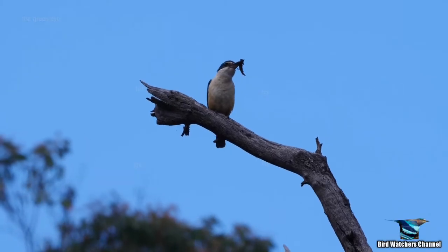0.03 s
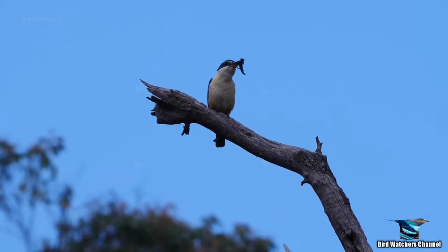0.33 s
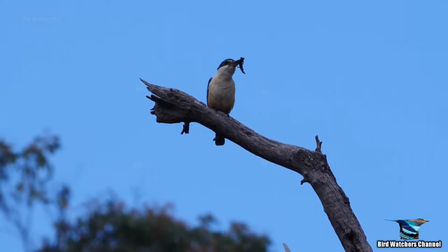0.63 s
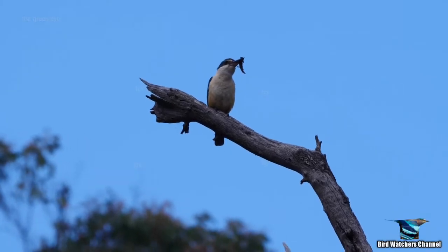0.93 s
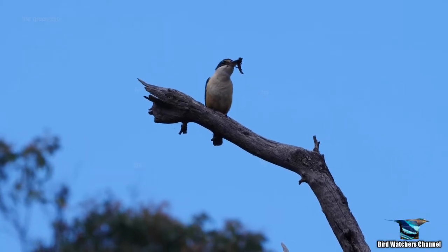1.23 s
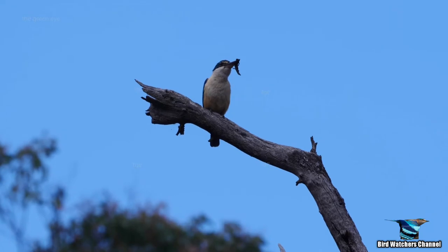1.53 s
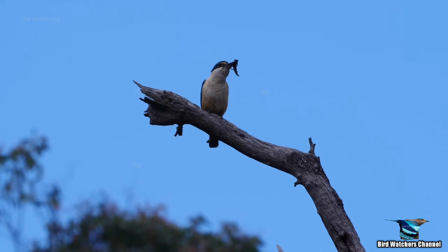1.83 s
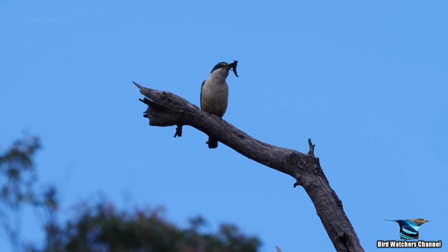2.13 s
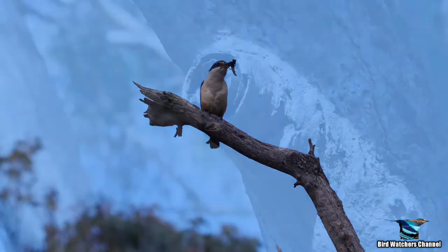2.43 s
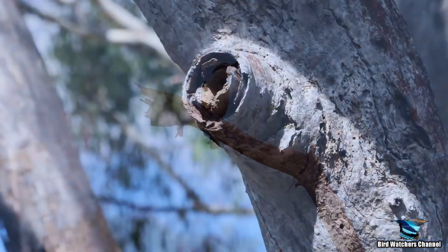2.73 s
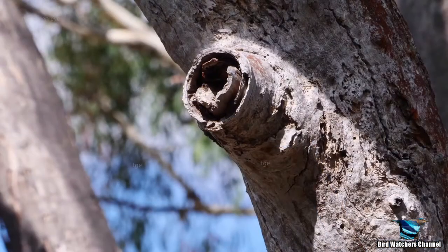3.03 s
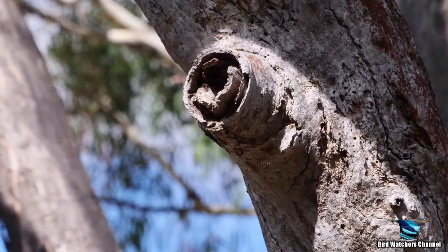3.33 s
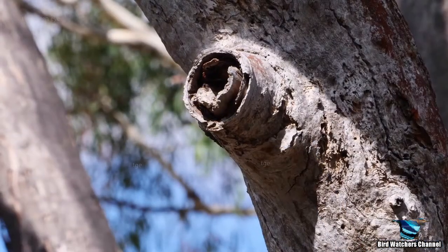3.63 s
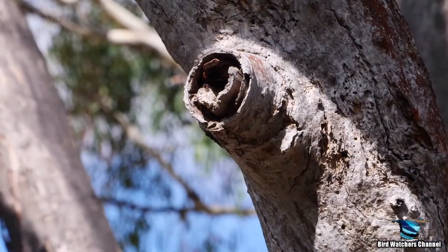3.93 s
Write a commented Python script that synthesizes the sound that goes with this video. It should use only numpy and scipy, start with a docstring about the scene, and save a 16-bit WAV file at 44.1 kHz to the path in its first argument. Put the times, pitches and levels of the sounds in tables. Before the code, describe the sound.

In woodland, a kingfisher repeats four harsh calls that climb in pitch above a soft rumble and throbbing insects. The sound cuts out, then returns with a high cicada buzz, rattling insects, stronger rumble and far bird whistles and chatter.

```python
"""Over a low rumble and insects throbbing in the trees, a kingfisher on a dead branch calls four times.
Each harsh call from its syrinx: a falling squawk, a rasp, then short notes that clear and rise.
At 2.4 s the woods fall silent. At 2.9 s a second spot, by a hollow tree, cuts in: heavier rumble,
a cicada buzzing with buckling ribs, rattling and trilling insects, then far birds that whistle and
chatter. Near 3.8 s the buzz dulls and the rattle stops."""
import sys
import numpy as np
from scipy import signal
from scipy.fft import rfft, irfft
from scipy.io import wavfile
from scipy.ndimage import uniform_filter1d

SR = 44100
rng = np.random.default_rng(int(sys.argv[2]) if len(sys.argv) > 2 else 0)


def generate_wav(sig):
    """Save sig (samples, or channels by samples) to the path in sys.argv[1] as 16-bit PCM at SR."""
    pcm = np.round(np.clip(np.atleast_2d(sig).T, -1, 1) * 32767).astype(np.int16)
    wavfile.write(sys.argv[1], SR, pcm)


N = 176400
TIME = np.arange(N) / SR
EDGE_HZ, INSECT_FADE_S = 15400, 0.03


def amp(db):
    """Decibels to gain."""
    return 10 ** (np.asarray(db) / 20)


def unit_rms(x):
    """Scale to rms 1."""
    return x / np.sqrt(np.mean(x ** 2) + 1e-20)


def curve_at(points, hz):
    """Interpolate a curve on a log-frequency axis."""
    freq_hz, value = np.transpose(points)
    return np.interp(np.log(hz + 1), np.log(freq_hz + 1), value)


def add(mix, start_s, sound):
    """Mix a sound in, cropped to the buffer."""
    at = round(start_s * SR)
    sound = sound[max(-at, 0):]
    part = mix[max(at, 0):][:len(sound)]
    part += sound[:len(part)]


def colour(x, spectrum):
    """Filter by (freq_hz, gain_db) points."""
    hz = np.fft.rfftfreq(x.shape[-1], 1 / SR)
    return irfft(rfft(x) * amp(curve_at(spectrum, hz)), x.shape[-1])


def wander(rate_hz, size):
    """Smooth random drift, rms 1."""
    hz = np.fft.rfftfreq(size, 1 / SR)
    return unit_rms(irfft(rfft(rng.standard_normal(size)) * np.exp(-(hz / rate_hz) ** 2), size))


def stereo_noise(spectrum, coherence, balance, patchy_db):
    """Coloured noise with drifting patches, rms 1; balance is left over right in dB."""
    frames, hz = N // 512 + 5, np.fft.rfftfreq(2048, 1 / SR)
    a, b, c, d, patches = rng.standard_normal((5, frames, len(hz)))
    patches = uniform_filter1d(patches, size=6, axis=0)
    patches = unit_rms(uniform_filter1d(patches, size=10, axis=1))
    alike = np.clip(curve_at(coherence, hz), -1, 1)
    lean = amp(curve_at(balance, hz) / 2)
    left = a + 1j * b
    right = alike * left + np.sqrt(1 - alike ** 2) * (c + 1j * d)
    bins = np.array([left * lean, right / lean]) * amp(curve_at(spectrum, hz) + patchy_db * patches)
    _, noise = signal.istft(bins.transpose(0, 2, 1), nperseg=2048, noverlap=1536)
    return unit_rms(noise[:, :N])


def perch_air():
    """Low rumble and faint hiss around the branch."""
    # background spectrum: freq_hz, relative_db
    spectrum = [(25, -21.5), (60, -4), (150, -1.5), (320, -2.5), (420, -6.5), (900, -11.5), (1450, -12),
                (2000, -16), (4000, -15), (4750, -11.5), (5600, -21.5), (8000, -15), (11000, -27),
                (15000, -29.5)]
    # left-right likeness: freq_hz, correlation
    coherence = [(50, 0.78), (500, 0.64), (2000, 0.73), (8000, 0.43)]
    # stereo balance: freq_hz, left_over_right_db
    balance = [(50, 0.0039)]
    return amp(-48.5) * stereo_noise(spectrum, coherence, balance, patchy_db=1.72)


def syrinx(t, pitch_hz, rough, overtones_db):
    """One note shaped by the throat; roughness adds jitter, phase smear, flutter and turbulent air."""
    # throat and bill resonance: freq_hz, gain_db
    throat = [(850, -28), (1150, -13), (1400, -12), (1800, -12), (2020, -17.5), (2280, -7.5), (2540, -11.5),
              (2800, -4), (3450, -1.5), (3850, -3.5), (4250, -11.5), (4700, -16), (5400, -26), (7000, -30),
              (9000, -30), (10700, -25), (12700, -26.5), (15000, -35.5)]
    jitter_hz, flutter_hz, overtones_above_hz = 375, 263.3, 8000
    attack_s, release_s = 0.0018, 0.0042
    rough, n = np.clip(rough, 0, 1), len(t)
    jitter = 0.075 * rough * wander(jitter_hz, 4096)[:n]
    phase = 2 * np.pi * np.cumsum(pitch_hz * (1 + jitter)) / SR
    tone = np.zeros(n)
    for k in range(1, 15):
        hz = k * pitch_hz
        gain = amp(curve_at(throat, hz) + overtones_db * (hz > overtones_above_hz)) * (hz < EDGE_HZ)
        smear_rad = 1.3 * rough * wander(flutter_hz, 4096)[:n]
        tone += gain * np.cos(k * phase + smear_rad)
    breath = colour(rng.standard_normal(4096)[:n] * (1 + np.cos(phase)), throat)
    flutter = np.exp(0.27 * rough * wander(flutter_hz, 4096)[:n])
    voice = unit_rms((unit_rms(tone) + 0.22 * rough * unit_rms(breath)) * flutter)
    return voice * np.minimum((t - t[0]) / attack_s, 1) * np.minimum((t[-1] - t) / release_s, 1)


def kingfisher_squawks():
    """Each call opens on a clear note that breaks downward, roughens and shudders."""
    # opening squawks: start_s, level_db
    squawks = [(-.01, -35.5), (0.643, -36.5), (1.261, -36.5), (1.881, -36.5)]
    # squawk contour: offset_s, pitch_hz
    contour = [(-.007, 1654), (.002, 1793), (.015, 1743), (.021, 1382), (.03, 1210), (.05, 1067)]
    rise_s, break_s, end_s = 0.00299, 0.017, 0.055
    shudder_hz = 90
    t = np.arange(contour[0][0], end_s, 1 / SR)
    pitch_hz = np.interp(t, *np.transpose(contour))
    broken = np.sqrt(np.clip((t - break_s) / (end_s - break_s), 0, 1))
    shudder_db = 3 * (t > break_s) * np.sin(2 * np.pi * shudder_hz * (t - break_s))
    envelope_db = -9 * np.clip(1 - t / rise_s, 0, 1) - 5.5 * broken
    out = np.zeros(N)
    for start_s, level_db in squawks:
        note = syrinx(t, pitch_hz, rough=0.029 + 0.36 * broken, overtones_db=-0.5)
        add(out, start_s + t[0], amp(level_db + envelope_db + shudder_db) * note)
    return out


def kingfisher_syllables():
    """Short sagging notes after each squawk; the voice clears as it climbs."""
    # syllables: start_s, pitch_hz, level_db
    syllables = [(0.033, 1113, -48), (0.052, 1117, -49), (0.088, 1112, -43), (0.115, 1115, -41.5),
                 (0.142, 1174, -40.5), (0.171, 1285, -41), (0.202, 1338, -40.5), (0.231, 1460, -42),
                 (0.265, 1547, -40), (0.294, 1768, -35.5), (0.328, 1809, -36.5), (0.361, 1793, -36.5),
                 (0.393, 1801, -38.5), (0.427, 1804, -40.5), (0.692, 1113, -46.5), (0.726, 1116, -49),
                 (0.751, 1130, -44.5), (0.775, 1143, -42.5), (0.804, 1138, -42), (0.828, 1258, -38.5),
                 (0.859, 1382, -40.5), (0.888, 1520, -42.5), (0.917, 1744, -38), (0.951, 1753, -39.5),
                 (0.983, 1807, -37.5), (1.019, 1815, -38.5), (1.318, 1109, -47), (1.349, 1095, -46),
                 (1.375, 1111, -43), (1.403, 1172, -42), (1.435, 1305, -41), (1.463, 1458, -41.5),
                 (1.496, 1660, -39), (1.527, 1738, -37.5), (1.562, 1789, -37), (1.595, 1772, -37.5),
                 (1.63, 1813, -37.5), (1.933, 1106, -48.5), (1.952, 1100, -48.5), (1.981, 1110, -45),
                 (2.008, 1114, -42.5), (2.035, 1169, -42.5), (2.063, 1276, -42.5), (2.092, 1397, -40.5),
                 (2.122, 1500, -41.5), (2.155, 1690, -38.5), (2.186, 1758, -37), (2.221, 1783, -38),
                 (2.256, 1769, -39.5)]
    # voice by register: pitch_hz, roughness, length_s, sag_ratio, overtones_db
    register = [(1108, .58, 0.026, 0.029, -1.5), (1173, 0.42, 0.027, 0.016, -0.5),
                (1264, .08, 0.025, 0.031, -1.5), (1520, 0.1, 0.026, 0.078, 1), (1683, 0.25, .025, 0.08, 1),
                (1797, 0.3, .024, 0.016, -0.5), (1800, .17, 0.024, 0.013, -6)]
    weak_db, rough_per_db = -44, 0.34
    register_hz, *columns = np.transpose(register)
    out = np.zeros(N)
    for start_s, pitch_hz, level_db in syllables:
        rough, length_s, sag, overtones_db = (np.interp(pitch_hz, register_hz, c) for c in columns)
        rough *= 2 + rough_per_db * (weak_db - level_db)  # weaker notes rasp more
        t = np.arange(0, length_s, 1 / SR)
        u = 2 * t / t[-1] - 1  # -1 to 1 across the note
        bend = 1 - sag * u / 2 - 0.014 * u ** 2 - 0.075 * u ** 8  # sag, arch, hooked ends
        envelope_db = 1.04 - u ** 2
        note = syrinx(t, pitch_hz * bend, rough, overtones_db)
        add(out, start_s, amp(level_db + envelope_db) * note)
    return out


def woods(x):
    """Direct sound plus near echoes and a thin stereo tail from the trees."""
    # branch and ground echoes: delay_s, gain_db
    echoes = [(0.0129, -20.5), (.022, -16)]
    tail_db, spread, build_s = -12, 0.52, 0.0069
    low_t60_s, treble_t60_s, split_hz = 0.37, 0.22, 5000
    t = np.arange(SR) / SR
    middle, side = rng.standard_normal((2, SR))
    noise = np.array([middle + spread * side, middle - spread * side])
    low = signal.sosfilt(signal.butter(2, split_hz, fs=SR, output="sos"), noise)
    tail = low * amp(-60 * t / low_t60_s) + (noise - low) * amp(-60 * t / treble_t60_s) / 2
    tail *= np.minimum(t / build_s, 1)
    tail *= amp(tail_db) / np.linalg.norm(tail[0])
    for delay_s, gain_db in echoes:
        tail[:, round(delay_s * SR)] += amp(gain_db)
    return x + signal.fftconvolve(x[None], tail, axes=1)[:, :N]


def throbbing_insects():
    """A high shrill that throbs and swells."""
    # shrill spectrum: freq_hz, relative_db
    spectrum = [(4000, -40), (4700, 0.5), (5400, -15.5), (6700, -2), (8000, 1), (9200, -1), (10500, -23.5),
                (14000, -28.5)]
    # swells: time_s, level_db
    swells = [(0, -56), (.1, -56), (.2, -67), (.35, -59.5), (.95, -58), (1.1, -52.5), (1.19, -61.5),
              (1.3, -56), (1.7, -58), (1.8, -61.5), (2.0, -58)]
    throb_hz = 22 * (1 + 0.11 * wander(3.83, N))
    throb = unit_rms(1 + 0.5 * np.sin(2 * np.pi * np.cumsum(throb_hz) / SR))
    shrill = stereo_noise(spectrum, coherence=[(8000, 0.3)], balance=[(8000, -1)], patchy_db=4.5)
    return shrill * throb * amp(np.interp(TIME, *np.transpose(swells)))


def hollow_air():
    """Heavier rumble by the hollow tree."""
    # background spectrum: freq_hz, relative_db
    spectrum = [(20, -19), (50, -9), (115, 4), (200, -1.5), (290, -0.5), (400, -8.5), (600, -15.5),
                (900, -22.5), (1400, -20.5), (1900, -26), (2400, -21.5), (3300, -29.5), (4000, -27.5),
                (5400, -28.5), (12000, -33.5), (15000, -55)]
    # left-right likeness: freq_hz, correlation
    coherence = [(60, 1), (540, 0.84), (1640, 0.82), (5000, 1)]
    # stereo balance: freq_hz, left_over_right_db
    balance = [(40, -8), (110, 4), (380, 3), (900, 0)]
    return amp(-43) * stereo_noise(spectrum, coherence, balance, patchy_db=1.95)


def cicada():
    """Ribs buckle in the same pattern each cycle, each snap ringing near 8 kHz; the top dulls late."""
    # ring spectrum: freq_hz, relative_db
    spectrum = [(4000, -60), (6200, -19.5), (6800, -8.5), (7250, -10.5), (7950, 3), (8400, -4), (8900, -1),
                (9500, -8), (10500, -10.5), (11800, -34), (15000, -42)]
    # rib snaps: cycle_fraction, relative_db
    ribs = [(0.199, -7.5), (.43, -4.5), (.765, -10), (0.918, -4.5)]
    cycle_hz, ring_s, wash, dull_s = 69.8, 0.0011, 0.28, 3.755
    power = np.zeros(N)
    for cycle_fraction, relative_db in ribs:
        age_s = ((TIME * cycle_hz - cycle_fraction) % 1) / cycle_hz
        power += amp(relative_db) ** 2 * np.exp(-age_s / ring_s)
    ring = stereo_noise(spectrum, coherence=[(8000, 0)], balance=[(8000, -2)], patchy_db=2)
    buzz = amp(-43.5) * unit_rms(ring * np.sqrt(power + wash ** 2))
    dull = np.clip((TIME - dull_s) / INSECT_FADE_S, 0, 1)
    return (1 - dull) * buzz + dull * colour(buzz, [(9050, 1.5), (9500, -4.5)])


def rattling_insect():
    """Even strokes near 7 kHz with short gaps, until it stops."""
    # stroke spectrum: freq_hz, relative_db
    spectrum = [(5700, -24), (6500, -1), (8000, -1), (9800, -28)]
    stroke_hz, offset_s, end_s = 31, 0.0103, 3.78
    strokes = abs(np.cos(np.pi * stroke_hz * (TIME - offset_s)))
    singing = np.clip((end_s - TIME) / INSECT_FADE_S, 0, 1)
    hiss = colour(rng.standard_normal((2, N)), spectrum)
    return amp(-51.5) * singing * unit_rms(strokes * hiss)


def trilling_insect():
    """Even pulses near 5 kHz."""
    # trill spectrum: freq_hz, relative_db
    spectrum = [(3500, -40), (4100, -10), (4700, 6), (5050, -6), (5450, -8), (7000, -22)]
    pulse_hz = 30
    pulses = (1 + np.cos(2 * np.pi * pulse_hz * TIME)) ** 0.91
    hiss = stereo_noise(spectrum, coherence=[(5000, 0.97)], balance=[(5000, 0)], patchy_db=2.5)
    return amp(-62.5) * unit_rms(pulses * hiss)


def far_whistle():
    """A far bird's two thin, wavering notes."""
    # one contour per note: time_s, pitch_hz, level_db
    notes = [
        [(2.915, 3010, -56), (2.96, 3720, -51), (3.02, 3970, -52), (3.045, 4130, -52)],
        [(3.1, 3720, -52), (3.17, 3700, -48.5), (3.2, 3590, -55), (3.24, 3380, -58)],
    ]
    waver_hz, flicker_db, ramp_s = 180, 3, 0.005
    out = np.zeros(N)
    for note in notes:
        time_s, pitch_hz, level_db = np.transpose(note)
        gate = np.clip(np.minimum(TIME - time_s[0], time_s[-1] - TIME) / ramp_s, 0, 1)
        hz = np.interp(TIME, time_s, pitch_hz) * (1 + 0.012 * wander(waver_hz, N))
        gain = amp(np.interp(TIME, time_s, level_db) + flicker_db * wander(waver_hz, N))
        out += gate * gain * np.sin(2 * np.pi * np.cumsum(hz) / SR)
    return out


def far_chatter():
    """Far birds' harsh chatter, blurred into noise bursts."""
    # bursts: centre_s, sigma_s, level_db
    bursts = [(2.944, 0.043, -51.5), (3.072, 0.015, -48), (3.275, 0.016, -47.5), (3.351, .016, -48.5),
              (3.506, 0.019, -48)]
    # chatter spectrum: freq_hz, relative_db
    spectrum = [(700, -13.5), (1350, 3.5), (1900, -7.5), (2550, 3), (3100, -3), (3700, -4.5), (4750, -0.5),
                (6000, -20)]
    envelope = sum(amp(level_db) * np.exp(-0.5 * ((TIME - centre_s) / sigma_s) ** 2)
                   for centre_s, sigma_s, level_db in bursts)
    return envelope * stereo_noise(spectrum, coherence=[(2000, 0.99)], balance=[(2000, 0)], patchy_db=2.5)


def scene():
    """The perch, a short silence, then the spot by the hollow tree."""
    perch_end_s, fade_out_s = 2.412, 0.013
    hollow_start_s, fade_in_s = 2.885, 0.0012
    perch = woods(kingfisher_squawks() + kingfisher_syllables()) + throbbing_insects() + perch_air()
    hollow = hollow_air() + cicada() + rattling_insect() + trilling_insect()
    hollow += woods(far_whistle()) + far_chatter()
    perch_gate = np.clip((perch_end_s - TIME) / fade_out_s + 1, 0, 1)
    hollow_gate = np.clip((TIME - hollow_start_s) / fade_in_s, 0, 1)
    return perch * perch_gate + hollow * hollow_gate


def record(dry):
    """Steep low-pass at the band edge."""
    lowpass = signal.firwin(511, EDGE_HZ, window=("kaiser", 9), fs=SR)
    return signal.oaconvolve(dry, lowpass[None], "same")


dry = scene()
out = record(dry)
generate_wav(out)
```